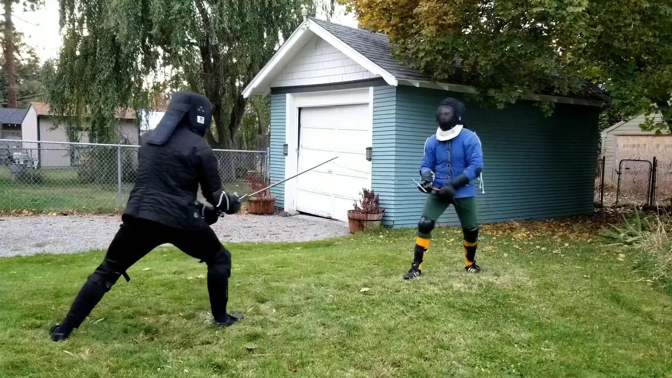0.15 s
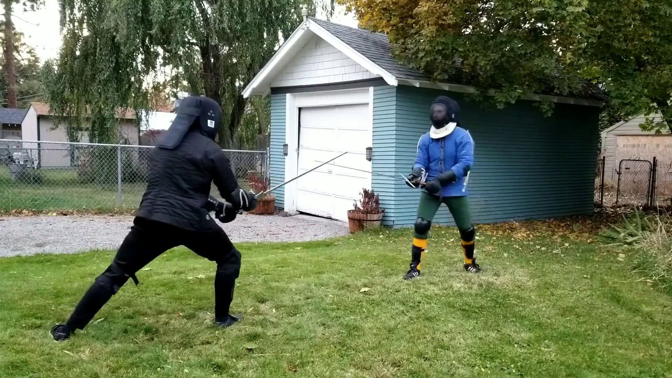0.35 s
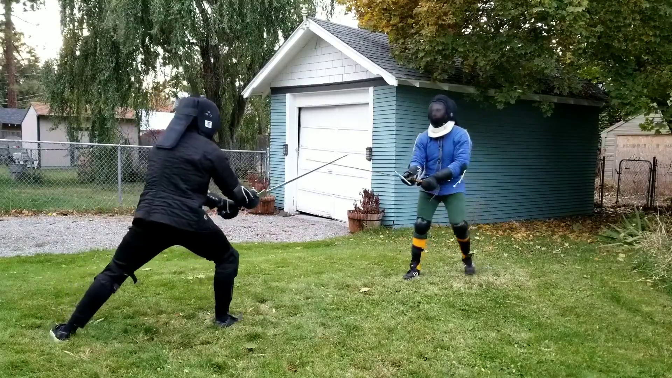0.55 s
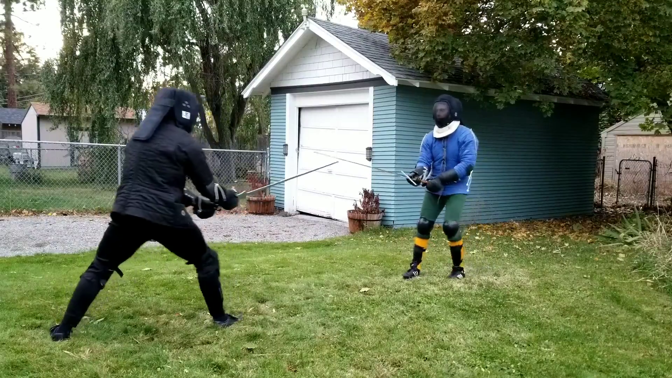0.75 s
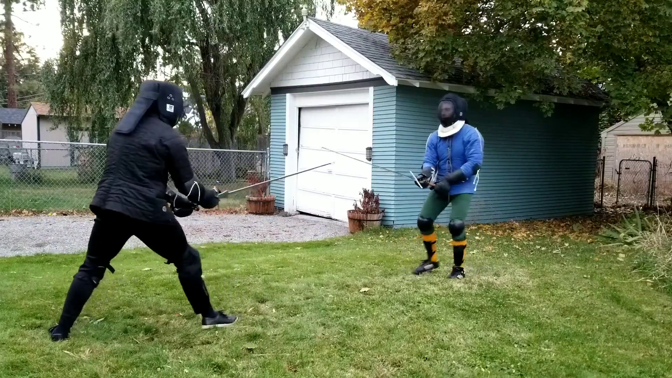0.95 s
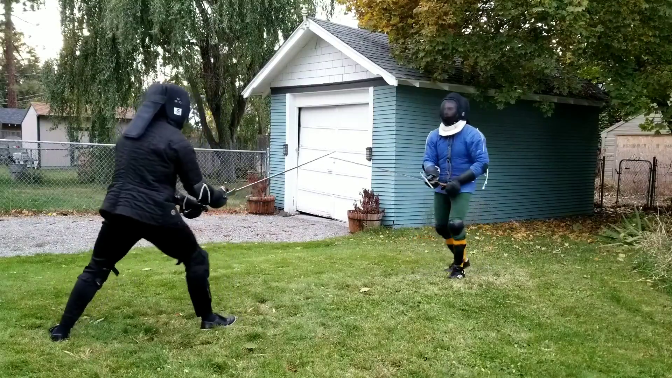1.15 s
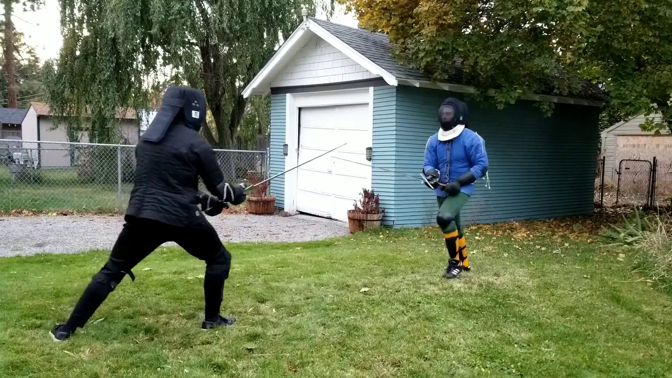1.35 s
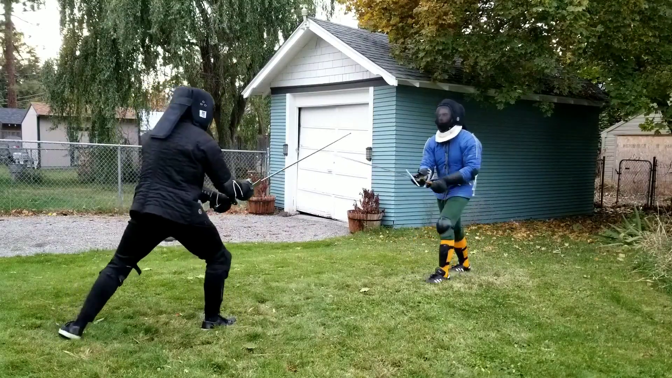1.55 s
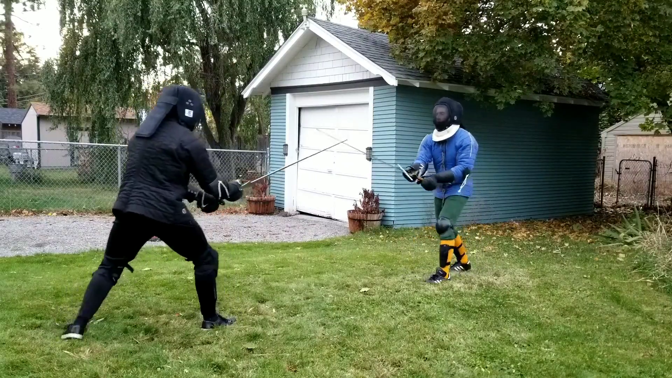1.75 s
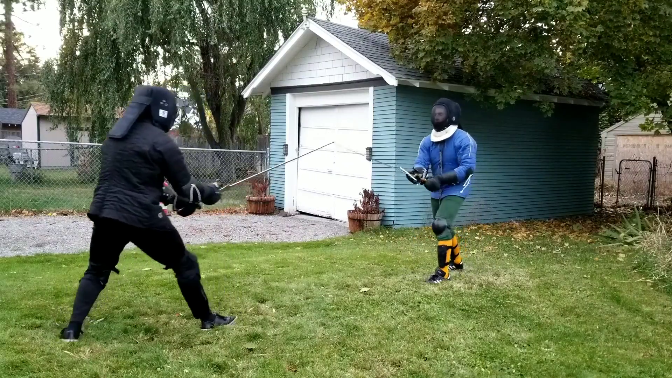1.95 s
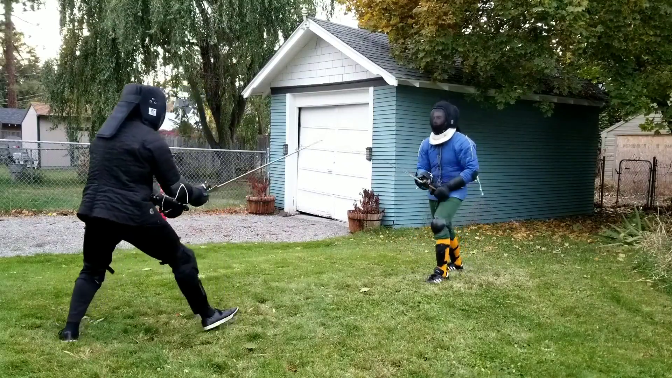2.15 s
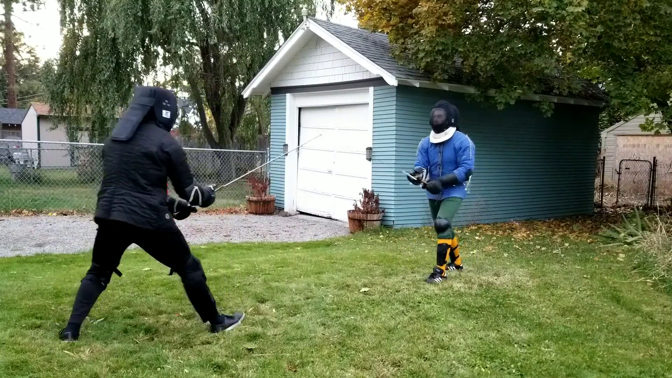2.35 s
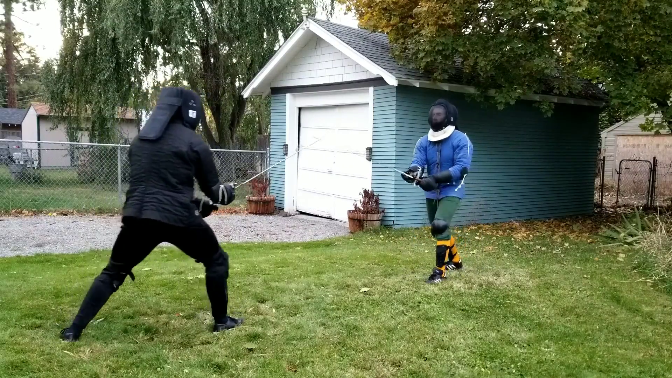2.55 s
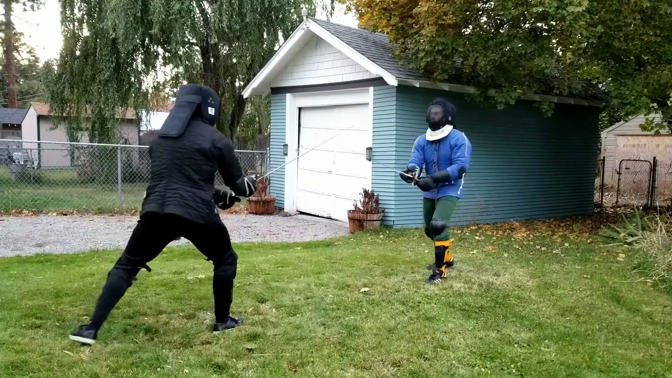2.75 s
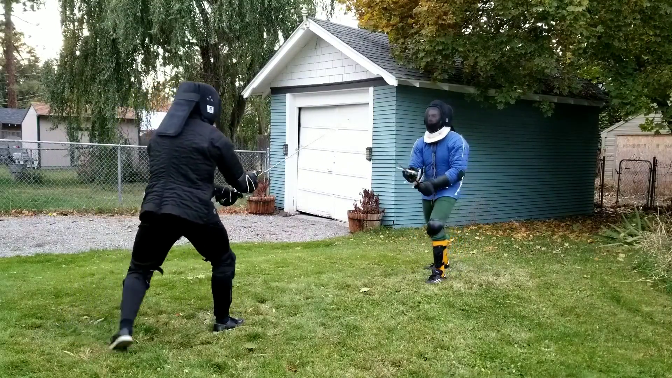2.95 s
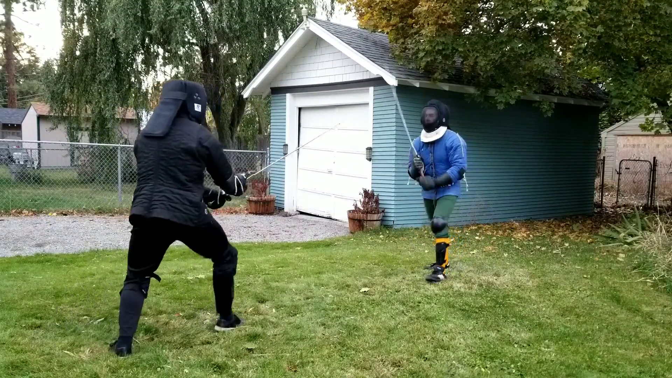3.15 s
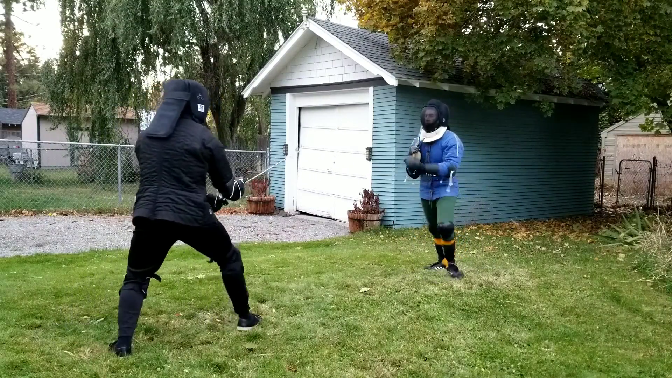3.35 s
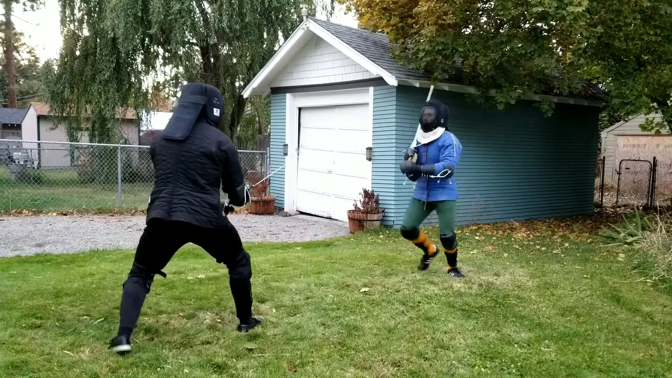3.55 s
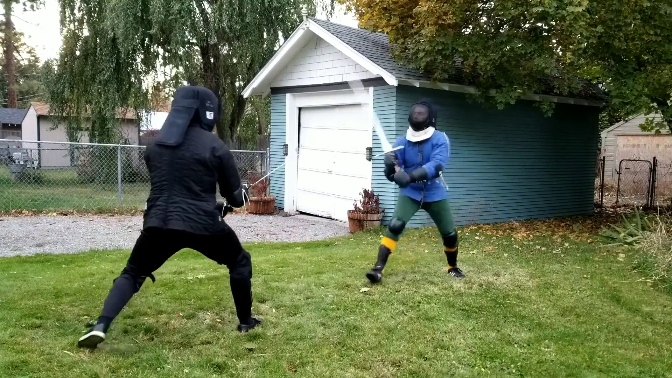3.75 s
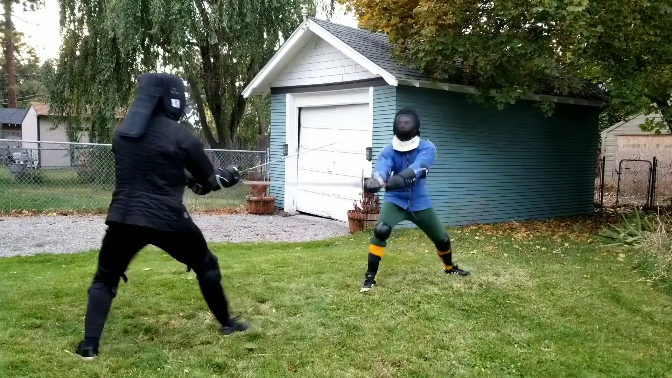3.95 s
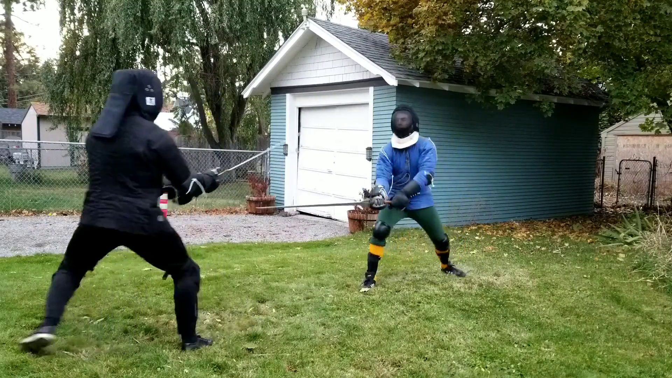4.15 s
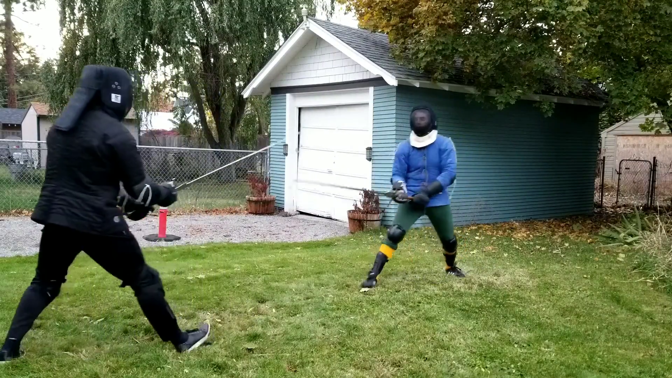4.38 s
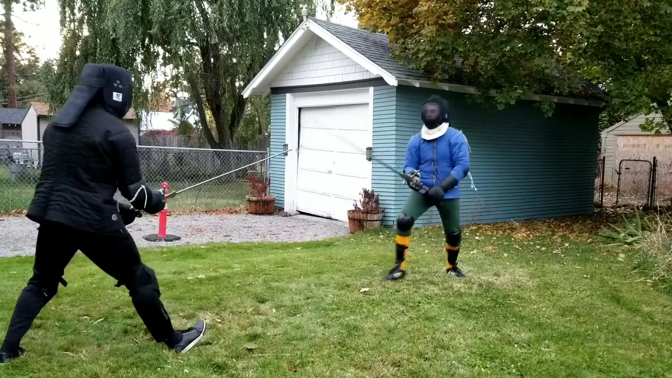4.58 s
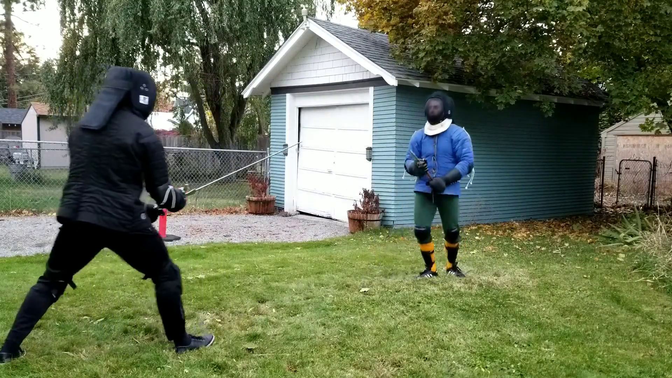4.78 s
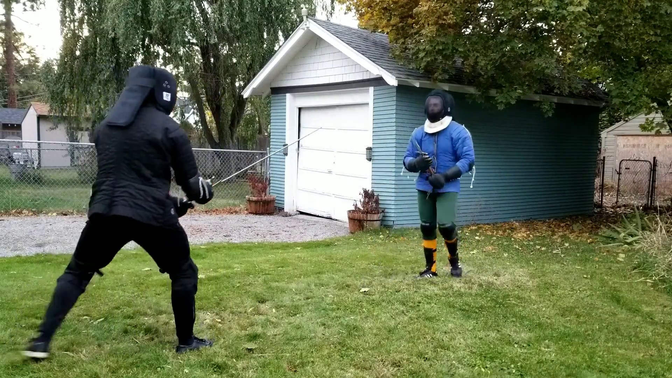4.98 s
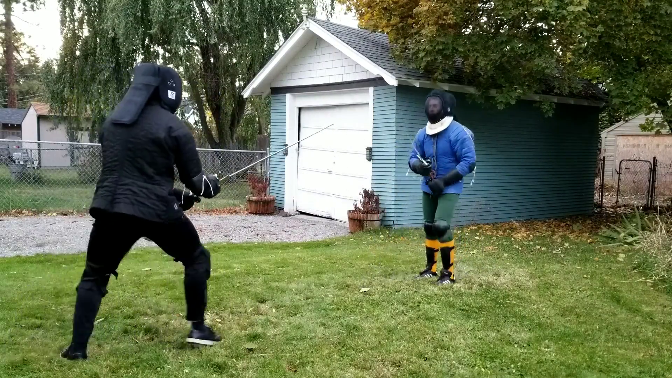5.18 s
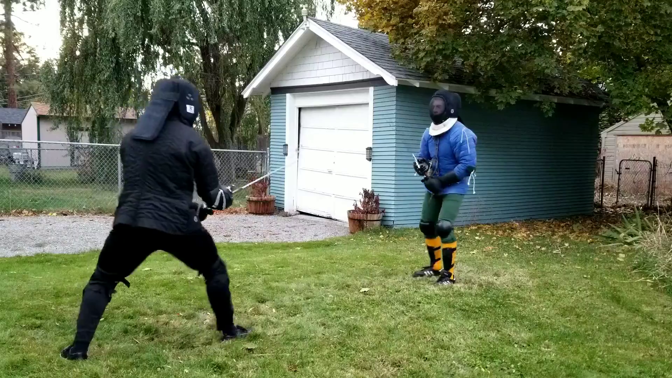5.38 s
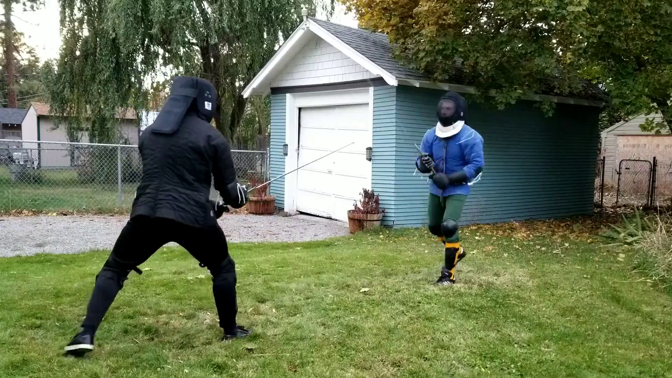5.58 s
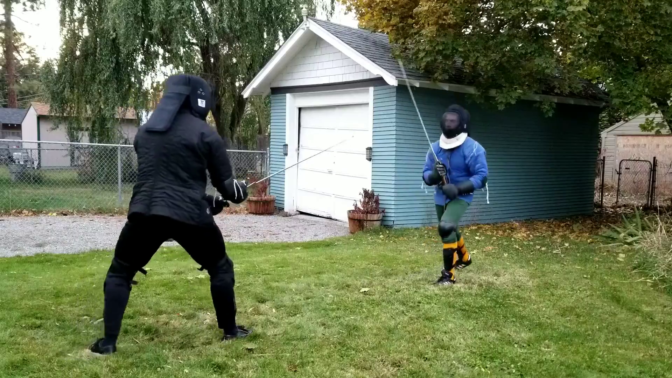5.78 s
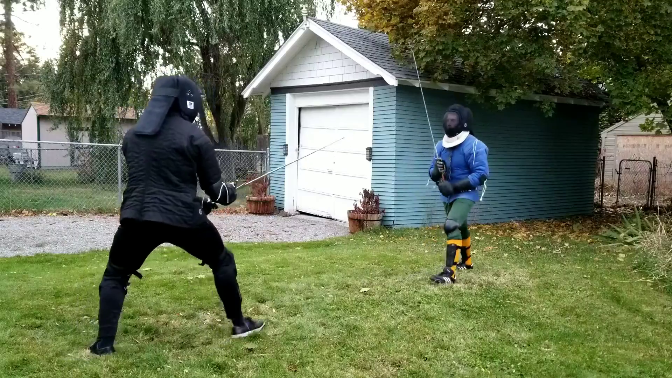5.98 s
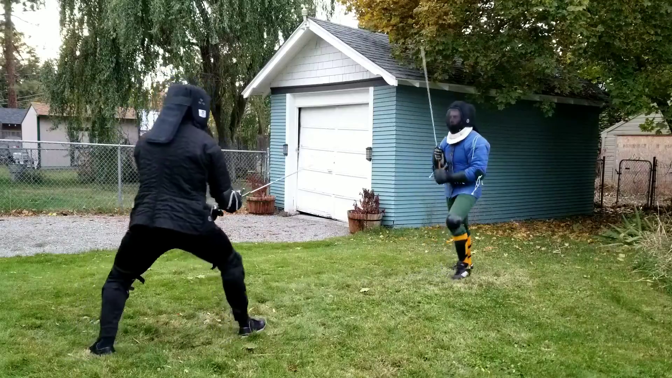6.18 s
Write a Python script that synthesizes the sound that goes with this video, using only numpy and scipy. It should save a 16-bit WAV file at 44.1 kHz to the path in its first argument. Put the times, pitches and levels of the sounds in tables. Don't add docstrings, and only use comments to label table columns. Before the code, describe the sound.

Five separate sword contacts, each a sharp metallic tick with dense high shimmer and clear thin rings fading in a fraction of a second, break a low, swelling bed of far traffic and idling engines. The first pair is close together, the others well spaced, the last by far the hardest. Tiny armour clicks are barely audible. Stereo phone sound, open yard, with level ducking at the end clash.

```python
import sys
import numpy as np
from scipy import signal
from scipy.fft import rfft, irfft
from scipy.io import wavfile
from scipy.ndimage import uniform_filter1d

SR = 44100
rng = np.random.default_rng(int(sys.argv[2]) if len(sys.argv) > 2 else 0)


def wav_record(signal):
    frames = np.transpose(np.atleast_2d(signal))
    bounded = np.clip(frames, -1, 1)
    quanta = np.round(bounded * 32767).astype(np.int16)
    wavfile.write(sys.argv[1], SR, quanta)


def invert_db(x):
    u = np.asarray(x, float) / 20
    return 10 ** u


N = 274290
T = np.arange(N) / SR

# t/s, strike level/dB, crack level/dB, left minus right/dB
CLASHES = [
    (0.5039, -27.5, -11, 5.5),
    (0.6861, -35.5, -19, 1),
    (1.8256, -36, -29, 1.5),
    (2.724, -28.5, -19, 0.5),
    (3.9365, -20.5, 16.5, 2),
]
# length/s, start level/dB, end level/dB, damping by hands/dB per s
SLIDES = [(0.011, -33, -30, 11), (0.071, -36.5, -44, 13), (.005, -27, -24.5, 3), (.01, -39, -30.5, 12),
          (0.023, -11, -1, 62)]
# wait after strike/s, ring level/dB, rise/s
PARTING = [(0, -28.5, 0.00028), (0.045, -37.5, .009), (0.0058, -32, 0.012), (0.026, -38.5, 0.001),
           (.016, -24.5, .008)]
# lowest f/Hz, tilt/dB per octave, brightest f/Hz, its lift/dB
CONTACT_COLOUR = [(1310, 0, 8300, 4), (1606, -2, 7600, 6), (1520, 0, 6400, 11), (1360, 0.5, 4900, 4.5),
                  (2800, 0.5, 6200, 1.5)]
# f/Hz, level/dB
STEEL_COLOUR = [(500, -30.5), (1500, 2), (2300, -8), (3500, -3.5), (5500, -5.5), (8000, -4), (9500, -8),
                (14600, -5.5)]
# f/Hz, T60/s
SHIMMER_T60 = [(1500, 0.067), (4000, 0.11), (8000, 0.071), (15000, 0.089)]
# f/Hz, level/dB, T60/s
BLADE_MODES = [(1669, -22, .35), (1880, -20, .4), (2724, -20, .4), (2965, -20, .4), (3230, -20, .4),
               (3580, -21, .4), (3911, -22, .45), (4685, -17, .3), (5290, -17, .27), (5825, -18, .3),
               (6330, -14, .28), (7370, -15, .25), (7860, -14, .24), (8345, -15, .22),
               (4086, -24, .35), (4393, -19, .27), (4810, -16, .2), (5105, -20, .3), (6800, -18, .28),
             (8075, -18, .3), (8592, -20, .26), (9410, -16, .28), (10830, -23, .22), (11845, -16, .25),
             (12460, -15, .25), (12650, -17, .22), (13273, -15, .24), (13950, -16, .22)]
# f/Hz, level/dB, T60/s, left minus right/dB
FAVOURED = [
    [(1669, -12, .35, 0), (1879, -12, .35, -2), (2978, -18, .6, -5), (3577, -18, .4, -5),
     (7849, -2, .22, 10), (8345, 1, .18, -3)],
    [(3233, -16, .4, 1), (3577, -5, .28, 0), (3911, -4, .4, 3), (5289, -9, .34, 3), (8070, -10, .33, 2),
     (8592, -9, .28, 0)],
    [(5844, -13, .22, 8), (6339, -11, .33, -2), (6877, -10, .21, -14), (7399, -9, .31, -7),
     (7873, 0, .25, -3), (14163, -8, .17, -3)],
    [(3214, -18, 4.5, 3), (4086, -19, .5, 8), (4393, -10, .25, -4), (5809, -10, .36, 6),
     (12000, -2, .24, -2), (13937, 1, .24, 1)],
    [(2935, -1, .25, -2), (3232, -11, .45, 6), (3588, -3, .6, 4), (4190, -8, .25, -3), (6815, -5, .22, 0),
     (12620, -2, .21, 3)],
]
# t/s, peak level/dB, f/Hz
ARMOUR_TICKS = [
    (2.144, -55, 7400),
    (2.166, -60, 8500),
    (4.4154, -52, 5000),
    (4.416, -59, 12500),
]
# f/Hz, level/dB
TOWN_COLOUR = [(19, -35.5), (32, -4.5), (70, -2.5), (228, -10), (445, -18.5), (1150, -15), (3500, -41),
               (7700, -120)]
# t/s, level/dB
TRAFFIC = [(0, -2), (1.2, -1), (2.4, 1.5), (3.6, 2), (4.2, 3), (5.2, 2), (6.2, 0)]
# f/Hz, likeness/0-1
LIKENESS = [(60, 0.94), (130, 0.95), (290, 0.78), (630, 0.48), (1390, 0.04), (3050, 0), (6700, 0),
            (14700, 0)]
# f/Hz, width/Hz, level/dB
ENGINES = [(40.74, 1.4, -51), (75.4, 8.7, -49.5), (230.1, 14, -52.5)]
# f/Hz, level/dB
HISS_COLOUR = [(1760, -32), (3000, -9), (3860, -2), (4430, -5), (6910, -7.5), (9800, -15), (13800, -6),
               (14600, -7.5)]
# f/Hz, level/dB
WHINES = [(6342, -85.5), (6783, -81)]
# f/Hz, left minus right/dB
PORTS = [(60, -2), (110, -2), (200, -2.5), (690, -4.5), (2350, -6.0), (4330, -4), (7980, 4), (14700, 3.5)]


def swords():
    out = np.zeros((2, N + 2 * SR))
    crowd = np.linspace(400, 15800, 560) + 12 * rng.standard_normal(560)
    t60_spread = invert_db(1.2 * rng.standard_normal(560))
    bank = modes(crowd, on_log(SHIMMER_T60, crowd) * t60_spread, length=.4)
    t = T[:bank.shape[1]]
    clashes = zip(CLASHES, SLIDES, PARTING, FAVOURED, CONTACT_COLOUR)
    for clash, (*slide, damping), parting, favoured, colour in clashes:
        start, strike_db, crack_db, pan_db = clash
        wait_s, free_db, rise_s = parting
        size, side = rng.standard_normal((2, len(crowd)))
        shimmer = beam(bank, colour_db(crowd, *colour) + 2 * size, 1.9 * side)
        body = shimmer * (invert_db(-damping * t) + invert_db(crack_db) * np.exp(-t / 0.00065))
        body = signal.lfilter(*signal.butter(3, .7 * colour[0], "high", fs=SR), body)
        force = contact(strike_db, *slide)
        add(out, start, signal.fftconvolve(body, force[None], axes=1), pan_db)

        hz, db, t60, lean_db = rings(favoured)
        ring = beam(modes(hz, t60, length=1) * swing(count=len(hz)), db, lean_db)
        rise = 1 - np.exp(-T[:SR] / np.clip(rise_s, 1e-4, .01))
        add(out, start + max(wait_s, 0), invert_db(free_db) * ring * rise, 0)
    add(out, CLASHES[-1][0], guards_thud(), 0)
    return out[:, :N]


def contact(strike_db, slide_s, start_db, end_db):
    let_go_s = .008
    t = T[:6000]
    grain, unevenness = rng.standard_normal((2, len(t)))
    chatter = unit(grain * invert_db(2.35 * unevenness))
    chatter = chatter * np.exp(-np.maximum(t - slide_s, 0) / let_go_s)
    slide_db = np.interp(t, [0, slide_s], [start_db, end_db])
    force = chatter * invert_db(slide_db) / np.sqrt(0.012 * SR)
    force[0] += invert_db(strike_db)
    return force


def colour_db(hz, lowest_hz, tilt_db, bright_hz, lift_db):
    fall_db, floor_db, lift_octaves = 57.5, -19.5, .2
    cut = np.clip(fall_db * np.log2(hz / lowest_hz), floor_db, 0)
    lift = lift_db * np.exp(-(np.log2(hz / bright_hz) / lift_octaves) ** 2)
    return on_log(STEEL_COLOUR, hz) + cut + tilt_db * np.log2(hz / 4000) + lift


def rings(favoured):
    scatter_db, beaming_db = 2, 5
    both = np.array(BLADE_MODES)
    chance = rng.standard_normal((len(both), 2))
    table = np.column_stack([both, beaming_db * chance[:, 1]])
    table[:, 1] += scatter_db * chance[:, 0]
    for mode in favoured:
        nearest = np.argmin(abs(both[:, 0] - mode[0]))
        table[nearest] = mode
    return table.T


def swing(count):
    swing_db, swing_s = 3, .025
    k = int(swing_s * SR)
    held = np.repeat(rng.standard_normal((count, SR // k + 1)), k, axis=1)[:, :SR]
    return invert_db(swing_db * uniform_filter1d(held, k, axis=1))


def beam(bank, db, pan_db):
    phase, order = rng.standard_normal((len(db), 2)).T
    lean = np.array([[1], [-1]]) / 2
    turn = 2 * np.pi * phase + np.pi / 2 * np.sign(order) * lean
    gain = invert_db(db + pan_db * lean) * np.exp(1j * turn)
    return np.imag(gain @ bank) / np.sqrt(np.sum(invert_db(db) ** 2) / 2)


def guards_thud():
    hz, level_db, t60_s = 565, -25, .22
    thud = np.imag(modes(hz * np.array([1, 1.15]), np.full(2, t60_s), length=.3))
    return invert_db(level_db) * thud.sum(axis=0) * np.ones((2, 1))


def modes(hz, t60, length):
    t = np.arange(int(length * SR)) / SR
    return np.exp(np.outer(2j * np.pi * hz - np.log(1000) / t60, t))


def ticks():
    out, t = np.zeros(N + SR), np.arange(400) / SR
    for start, db, hz in ARMOUR_TICKS:
        i = int(start * SR)
        out[i:i + len(t)] += invert_db(db + 6) * np.sin(2 * np.pi * hz * t) * np.exp(-t / .0005)
    return out[:N]


def yard(x):
    level_db, gap_s = -9, 0.0088
    near_t60_s, near_dull_hz = 0.21, 10600
    far_db, far_t60_s, far_dull_hz = -14.5, 0.56, 4440
    t = np.arange(int(.6 * SR)) / SR
    near, far = rng.standard_normal((2, 2, len(t))) * (1 - np.exp(-(t / gap_s) ** 2))
    near = signal.lfilter(*signal.butter(2, near_dull_hz, fs=SR), near)
    far = invert_db(far_db) * signal.lfilter(*signal.butter(2, far_dull_hz, fs=SR), far)
    echo = near * invert_db(-60 * t / near_t60_s) + far * invert_db(-60 * t / far_t60_s)
    echo = echo / np.sqrt(np.sum(echo ** 2, axis=1, keepdims=True))
    return x + invert_db(level_db) * signal.fftconvolve(x, echo, axes=1)[:, :N]


def town():
    level_db, rumble_share = -40, 0.68
    away_s, away_db_s = 4.7, 1
    roar_db = np.interp(T, *np.transpose(TRAFFIC))
    rumble_db = rumble_share * roar_db - away_db_s * np.maximum(T - away_s, 0)
    hz = np.fft.rfftfreq(N, 1 / SR)
    like = np.clip(on_log(LIKENESS, hz), 0, 1) ** .6
    colour = invert_db(on_log(TOWN_COLOUR, hz)) * (hz > 24) * (hz < 6000)
    mid, side = rfft(rng.standard_normal((2, N))) * colour
    both = np.sqrt(1 + like) * mid + np.sqrt(1 - like) * side * np.array([[1], [-1]])
    both = both / np.sqrt(np.mean(irfft(both.mean(axis=0), N) ** 2))
    out = 0
    for centre in 22 * 2 ** np.arange(0, 8.5, .5):
        octaves = np.log2(np.maximum(hz, 1) / centre)
        band = irfft(both * np.clip(1 - 2 * abs(octaves), 0, 1), N)
        low = 1 / (1 + (centre / 300) ** 4)
        swell_db = low * rumble_db + (1 - low) * roar_db
        flicker_db = (1.5 + 1.2 * low) * walk(6)
        out = out + band * invert_db(swell_db + flicker_db)
    return invert_db(level_db) * out


def drones():
    hz = np.fft.rfftfreq(N, 1 / SR)
    out = 0
    for centre, width, db in ENGINES:
        resonance = 1 / (1 + (2 * (hz - centre) / width) ** 2)
        out = out + invert_db(db) * unit(irfft(rfft(rng.standard_normal(N)) * resonance, N))
    return out


def hiss():
    level_db = -64.5 + 3.5 + 1.4 * walk(1.3)
    colour = invert_db(on_log(HISS_COLOUR, np.fft.rfftfreq(N, 1 / SR)))
    return invert_db(level_db) * unit(irfft(rfft(rng.standard_normal((2, N))) * colour, N))


def hum():
    out = 0
    for hz, db in [(360, -57)] + list(WHINES):
        out = out + invert_db(db + 0.47 * walk(1)) * np.sqrt(2) * np.sin(2 * np.pi * hz * T)
    return out


def on_log(table, hz):
    f, v = np.transpose(table)
    return np.interp(np.log(np.maximum(hz, 1)), np.log(f), v)


def unit(x):
    return x / np.sqrt(np.mean(x ** 2))


def walk(rate):
    k = int(SR / rate)
    held = np.repeat(rng.standard_normal(N // k + 1), k)
    return 0.81 * uniform_filter1d(uniform_filter1d(held, k), k)[:N]


def add(out, start, sound, pan_db):
    i = int(start * SR)
    out[:, i:i + sound.shape[1]] += sound * invert_db(np.array([[pan_db], [-pan_db]]) / 2)


def scene():
    return yard(swords() + ticks()) + town() + drones() + hiss() + hum()


def gain_db():
    duck_db, stays_db = -14.5, -8
    attack_s, hold_s, release_s = .01, .03, .03
    since = T - CLASHES[-1][0]
    down = np.clip(since / attack_s + 0.47, 0, 1)
    recovery = np.exp(-np.maximum(since - attack_s - hold_s, 0) / release_s)
    return down * (stays_db + (duck_db - stays_db) * recovery)


def roll_off(x):
    return signal.sosfilt(signal.butter(12, 15300, fs=SR, output="sos"), x)


def record(dry):
    top_hz, above_top_db, bottom_hz = 14480, -30, 35
    hz = np.fft.rfftfreq(N, 1 / SR)
    tilt = on_log(PORTS, hz) / 2
    top = above_top_db * np.clip((hz - top_hz) / 250, 0, 1)
    bottom = 1 - 1 / (1 + (hz / bottom_hz) ** 6)
    response = invert_db(np.array([tilt, -tilt]) + top) * bottom
    mix = irfft(rfft(dry) * response, N) * invert_db(gain_db())
    return roll_off(mix)


dry = scene()
out = record(dry)
wav_record(out)
```